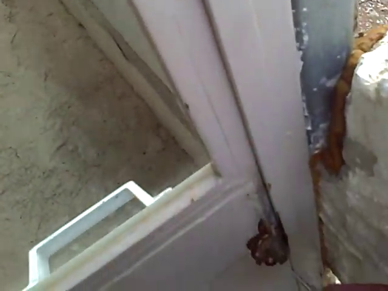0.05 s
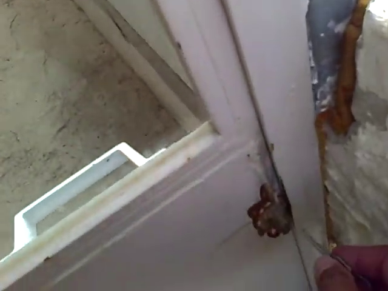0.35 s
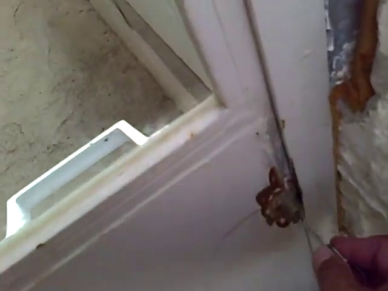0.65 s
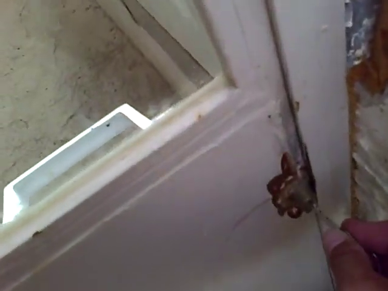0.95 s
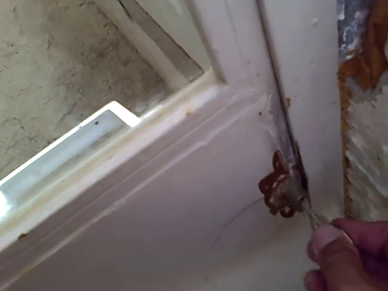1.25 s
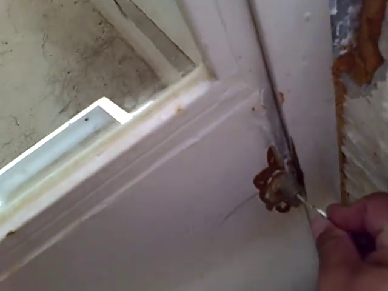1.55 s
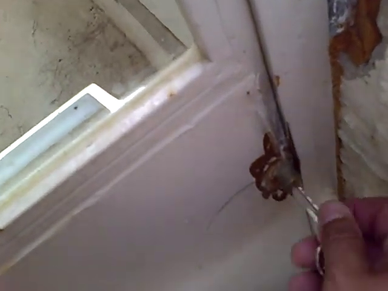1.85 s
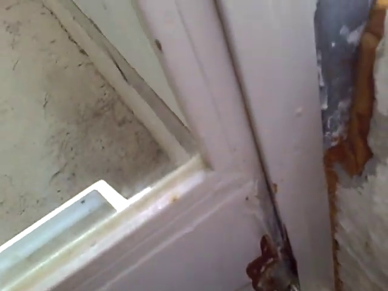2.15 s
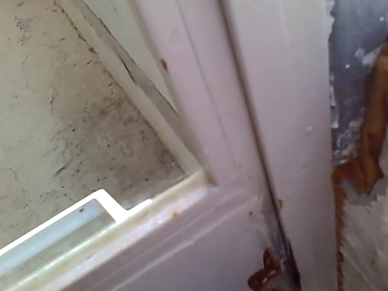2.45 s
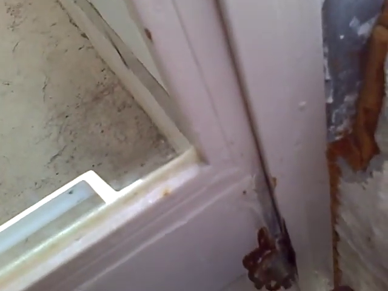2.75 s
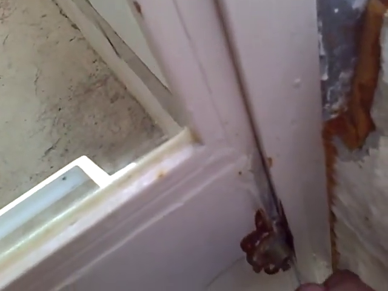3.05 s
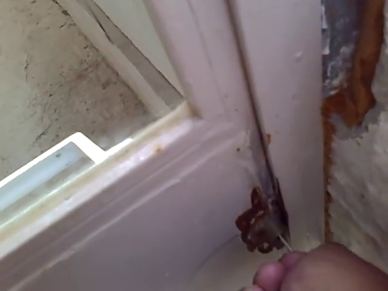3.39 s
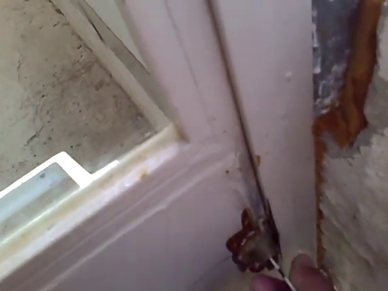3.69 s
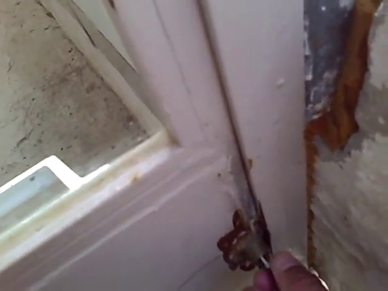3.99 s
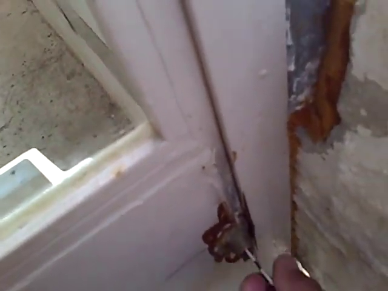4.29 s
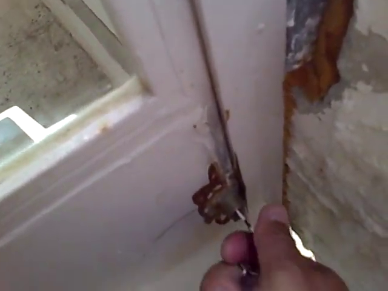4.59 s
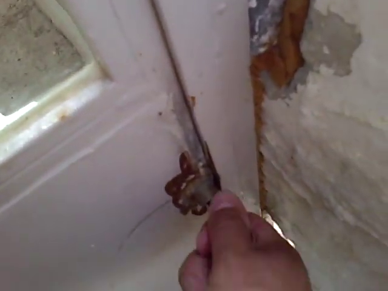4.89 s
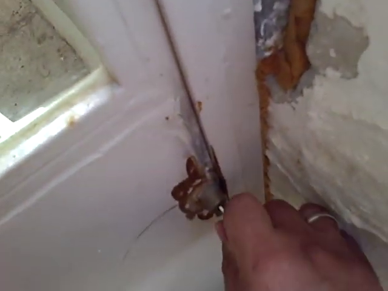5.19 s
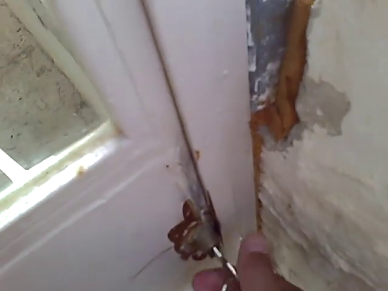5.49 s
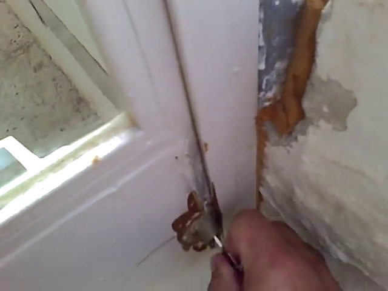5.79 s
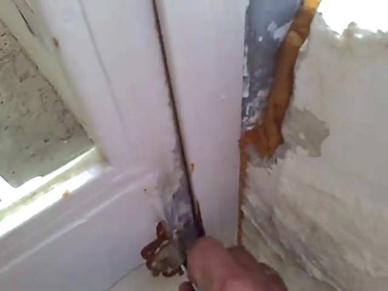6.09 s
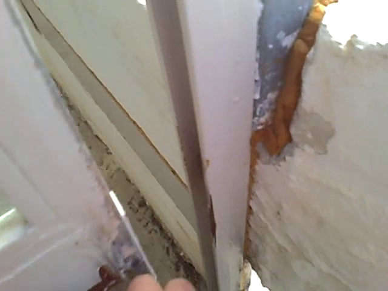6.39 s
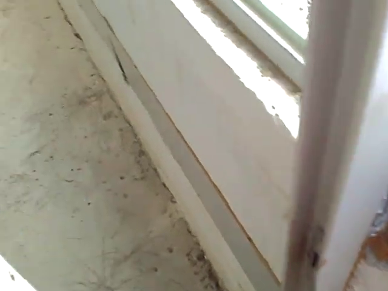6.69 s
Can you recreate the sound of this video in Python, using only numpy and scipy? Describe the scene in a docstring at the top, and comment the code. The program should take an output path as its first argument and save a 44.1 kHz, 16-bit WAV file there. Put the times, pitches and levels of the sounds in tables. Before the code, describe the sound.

Sharp metallic ticks and uneven knocks from a window latch over a low wooden shudder, with three loud clacks before the window swings open.

```python
"""Two dull taps close by, then a metal pin ticking and scraping in the rusty latch of an old wooden window. The
microphone is close to the hand, in a bare room. Each snap of the pin over rust rings the latch plate; the latch
knocks on the loose sash, which shudders in its frame as the hand leans on it. The latch gives with three loud
clacks, and the window swings open with a growing rumble of dragging wood."""
import sys
import numpy as np
from scipy import signal
from scipy.fft import rfft, irfft
from scipy.io import wavfile
from scipy.ndimage import uniform_filter1d

SR = 44100
rng = np.random.default_rng(int(sys.argv[2]) if len(sys.argv) > 2 else 0)


def inscribe(sig):
    """Save sig as 16-bit PCM at rate SR to the path in sys.argv[1].

    A 1-D sig is mono; a 2-D sig holds one channel per row.
    Samples are clipped to [-1, 1] before scaling.
    """
    pcm = np.round(np.clip(np.atleast_2d(sig).T, -1, 1) * 32767)
    wavfile.write(sys.argv[1], SR, pcm.astype(np.int16))


N = 306054
TIME = np.arange(N) / SR

# blows on the sash, mostly by the latch; the first, at 0.514 s, is a soft dull tap: (time [s], knock level
# [dB], thud level [dB], crack level [dB])
LATCH_BLOWS = [(0.514, -62, -72, -65.5), (0.804, -51.5, -56.5, -62), (1.136, -57, -57.5, -73),
               (1.159, -47.5, -60, -57), (1.181, -48, -54, -60), (1.284, -58, -48.5, -78),
               (1.373, -51, -63.5, -69), (1.4, -48.5, -46, -54.5), (1.717, -49, -51, -60.5),
               (1.771, -52, -41.5, -75), (2.054, -58, -46, -77), (2.088, -50, -60, -62.5),
               (2.156, -46, -46, -56.5), (2.23, -59, -45.5, -80), (2.353, -45, -50.5, -58.5),
               (2.678, -58.5, -50, -81), (2.775, -57.5, -50.5, -85), (2.825, -55.5, -45, -77),
               (2.88, -46, -50, -58), (2.953, -52.5, -51, -66.5), (3.08, -51, -45.5, -68.5),
               (3.115, -48.5, -44, -68.5), (3.266, -57.5, -48.5, -73.5), (3.444, -51, -50, -66),
               (3.468, -51, -43, -57.5), (3.491, -39.5, -34, -50), (3.512, -36.5, -32.5, -38.5),
               (3.766, -55.5, -37, -66), (4.048, -56.5, -45, -68.5), (4.148, -52.5, -61, -65),
               (4.237, -52, -43, -79.5), (4.331, -48.5, -42.5, -65), (4.409, -52, -49, -66),
               (4.543, -50, -39, -65.5), (4.602, -49.5, -44.5, -62), (4.926, -53, -47.5, -58.5),
               (5.003, -47.5, -47, -57), (5.02, -47.5, -49, -58), (5.154, -42.5, -49.5, -65),
               (5.164, -32, -43, -38.5), (5.178, -32, -38.5, -41), (5.195, -33, -47.5, -40),
               (5.208, -37, -54, -52.5), (5.551, -49.5, -39, -70), (5.607, -33, -39, -36.5),
               (6.08, -55, -48.5, -67), (6.26, -77, -48.5, -64), (6.695, -49, -37, -65)]
# a blow's knock, thud, crack and metallic edge: (low edge [Hz], high edge [Hz], trim [dB], rise [s])
BLOW_BANDS = [(500, 1550, -1.5, 0.0042), (106.2, 416, -2, 0.0028), (2030, 3880, 1.5, 0.0044),
              (4560, 6700, -6, 0.0037)]
# modes of the sash and its pane: (frequency [Hz], level [dB], t60 [s])
SASH_MODES = [(96.2, 2, 0.66), (152.6, -5.5, 0.42), (199.8, -1, 1), (217.7, 3, 1), (263.3, 4, 0.58),
              (289.5, -3, 0.99), (385.6, -5, 0.4), (426.5, 0, 0.7), (497, 6, 0.42), (651, 6.5, 0.23),
              (669, 3.5, .45), (734.6, 3, 0.35), (874, -1.5, 0.25), (988.6, 6, 0.17), (1046, 2.5, 0.063),
              (1076, -2.5, 0.32), (1184, -7, 0.42), (1260, -10, 0.15), (1400, 1, 0.18), (1443, 4, 0.21),
              (1430, -1, 0.17), (1623, -3, 0.13)]
# colour of the struck wood: (frequency [Hz], level [dB])
WOOD_SPECTRUM = [(70, 8.5), (300, -10), (700, -1.5), (1100, -7.5), (1500, 1.5), (1950, -17.5), (2500, -15),
                 (3400, -14), (4100, -15.5), (5000, -19), (6400, 4), (7500, -19)]
# dense wood vibration between the modes: (frequency [Hz], t60 [s])
WOOD_DECAY = [(100, 0.97), (300, 0.57), (700, 0.4), (1500, 0.19), (3000, 0.086), (6500, 0.068)]
# the steel pin on the latch: (time [s], pin level [dB], pitch [Hz], plate level [dB], snap level [dB])
PIN_TICKS = [(1.794, -49.5, 6310, -70.5, -59), (2.009, -41, 5400, -57.5, -35),
             (2.154, -31.5, 6140, -60, -39), (2.881, -43.5, 6050, -70, -46), (3.108, -48.5, 5900, -75, -44),
             (3.511, -24, 6160, -44, -10.5), (3.698, -48, 6230, -66, -42), (3.764, -36.5, 5700, -57.5, -54),
             (3.784, -40, 6200, -56, -38), (4.0763, -22, 6350, -58, -27.5), (4.124, -47, 6400, -68, -42),
             (4.148, -37, 6470, -60, -41), (4.193, -46, 6360, -71, -45), (4.1987, -42, 6450, -68, -51),
             (4.236, -35.5, 5900, -54, -43), (4.486, -51, 6500, -69, -54), (4.604, -45.5, 5900, -67, -47),
             (5.094, -38.5, 6650, -49.5, -47), (5.173, -21.5, 6000, -38, -26), (5.195, -23, 6580, -42, -44),
             (5.452, -33, 6450, -57.5, -48), (5.552, -44, 5570, -69, -67.5), (6.186, -57, 4740, -77, -55)]
# modes of the pin: (frequency [multiple of its pitch], level [dB], t60 [s])
PIN_MODES = [(.86, -3.5, 0.0024), (1, 7.5, 0.011), (1.1, 6, .006)]
# the hand leaning on the sash: (start [s], hold [s], level [dB])
HAND_PUSHES = [(0.783, .1, -56), (1.19, 0.34, -50.5), (1.7, 0.18, -41.5), (2.146, 0.16, -52),
               (2.834, .56, -49), (3.455, 0.08, -34), (3.66, 0.12, -40.5), (3.964, 0.74, -44),
               (4.892, 0.22, -45.5), (5.528, 0.22, -51), (6.076, .14, -45.5), (6.218, .72, -40.5)]
# deep sway of the sash: (frequency [Hz], level [dB])
SWAY_SPECTRUM = [(20, -11.5), (37, 10), (47, 0.5), (60, 0.5), (75, -1), (110, -58)]
# the sash shuddering in its frame: (frequency [Hz], level [dB])
SHUDDER_SPECTRUM = [(50, -13.5), (96, 1), (125, -4.5), (220, -8.5), (420, -15), (580, -18.5), (680, -15.5),
                    (900, -30), (1600, -31), (2500, -70)]
# dry wood dragging: (frequency [Hz], level [dB])
RUB_SPECTRUM = [(200, -26), (400, 7), (700, 4.5), (1400, 2.5), (1650, -6.5), (2000, -11.5), (3400, -16),
                (4400, -30), (6400, -23), (7600, -48)]
# modes of the sash once it hangs free: (frequency [Hz], level [dB], t60 [s])
GROAN_MODES = [(97.6, 7, 0.13), (146, -7.5, 0.28), (211, -3, 0.35), (252.7, -8.5, 0.28), (292, 4.5, 0.1),
               (384.5, -6, 0.22)]
# dull taps close to the microphone: (time [s], peak level [dB], upper edge [Hz], t60 [s])
DULL_TAPS = [(0.395, -40.5, 960, 0.15), (0.535, -42, 377, 0.082)]
# reverberation of the bare room: (frequency [Hz], t60 [s])
ROOM_DECAY = [(100, 1), (500, 0.91), (1500, 1), (3500, 0.84), (7000, 0.88)]
# background hiss at the microphone: (frequency [Hz], level [dB])
AIR_SPECTRUM = [(12, -25.5), (20, 9.5), (245, 1.5), (366, -6), (426, -1), (1020, -9), (1350, -5.5),
                (1650, -11), (1780, -11.5), (2280, -13), (3680, -15), (6230, -15.5), (6710, -15.5),
                (8000, -43.5), (10400, -46.5), (17600, -120)]


def latch_knocks(modes_db=-4, contact_spread_db=2.5, size=36000):
    """Close up, each blow on the sash, mostly by the latch, rings the sash modes and the dense wood between
    them."""
    out, t = np.zeros(N), np.arange(size) / SR
    modes = ring(SASH_MODES, size)
    contact_hz = np.geomspace(200, 7000, 18)
    attack = 1300  # opening samples that set a blow's level
    blows = []
    for noise in dying_noise(WOOD_DECAY, len(LATCH_BLOWS), size):
        # each point of contact favours other parts of the spectrum
        contact_db = contact_spread_db * rng.standard_normal(len(contact_hz))
        wood = colour(noise, np.transpose([contact_hz, read(WOOD_SPECTRUM, contact_hz) + contact_db]))
        blows.append(unit(wood, attack) + amp(modes_db) * unit(strike(modes), attack))
    blows = np.array(blows) * np.cos(np.pi / 2 * t / t[-1]) ** 2
    for k, (low_hz, high_hz, trim_db, rise_s) in enumerate(BLOW_BANDS):
        parts = band(blows * (1 - np.exp(-t / rise_s)), low_hz, high_hz)
        for (start, knock_db, thud_db, crack_db), part in zip(LATCH_BLOWS, parts):
            levels_db = knock_db, thud_db, crack_db, crack_db  # the metallic edge follows the crack
            add(out, start, amp(levels_db[k] + trim_db) * unit(part, attack))
    return out


def pin_ticks(pin_trim_db=-1, plate_trim_db=-3, snap_trim_db=-6, plate_hz=3330, contact_s=0.00078):
    """The pin snaps over rust in a brief rough contact; the plate rings and the window recess answers."""
    size = 6000
    out, t = np.zeros(N), np.arange(size) / SR
    for start, pin_db, pitch_hz, plate_db, snap_db in PIN_TICKS:
        rust, scatter, rattle = rng.standard_normal((3, size))
        force = rust * t / contact_s * np.exp(-t / contact_s)
        modes = ring(np.array(PIN_MODES) * [pitch_hz, 1, 1], size=800)
        pin = unit_peak(signal.fftconvolve(force, strike(modes))[:size])
        snap = unit_peak(band(force, 1700, 5700))
        recess = amp(-21) * unit(band(scatter, 6300, 6600, order=1)) * decay(t, t60=0.07)
        plate = band(rattle, plate_hz - 90, plate_hz + 90, order=1) * decay(t, t60=0.081)
        add(out, start, amp(pin_db + pin_trim_db) * (pin + recess))
        add(out, start, amp(snap_db + snap_trim_db) * snap)
        add(out, start, amp(plate_db + plate_trim_db) * unit(plate, size=1300))
        # the pin skips on over a crumb of rust
        add(out, start + rng.uniform(0.036, 0.042), amp(-59) * pin)
    return out


def sash_shudder(sway_db=-1.5, shudder_db=-3, modes_db=-2, jolt_db=-0.5, push_db=-3.5, thud_share=0.67):
    """Each push sways the loose sash; blows and pushes start small slips that keep its modes rumbling."""
    sway = np.sqrt(sum((amp(db) * swell(start, hold, t60=1.5)) ** 2 for start, hold, db in HAND_PUSHES))
    jolt_power = np.zeros(N)
    for start, knock_db, thud_db, _ in LATCH_BLOWS:
        blow_db = knock_db + thud_share * (thud_db - knock_db)
        jolt_power += (amp(jolt_db + blow_db) * swell(start, hold=0, t60=1.34)) ** 2
    shake = np.sqrt(jolt_power + (amp(push_db) * sway) ** 2)
    slips = grit(per_s=700, spread_db=-1)
    rough = steadied(colour(slips, SHUDDER_SPECTRUM))
    ringing = steadied(colour(rubbed(SASH_MODES, slips), SHUDDER_SPECTRUM))
    body = steadied(rough + amp(modes_db) * ringing)
    # the lowest mode only sounds fully when the whole sash sways
    lowest = signal.sosfiltfilt(signal.butter(3, 140, fs=SR, output="sos"), body)
    lowest_gain = np.minimum(amp(2) * sway / (shake + 1e-9), 1.25) ** 0.55
    body = body + lowest * (lowest_gain - 1)
    deep = steadied(colour(rng.standard_normal(N), SWAY_SPECTRUM))
    return deep * sway * amp(sway_db) + body * shake * amp(shudder_db)


def window_swing(start_s=6.04, speedup_s=0.866, brake_s=0.14, rub_db=-36, groan_db=-29, catch_db=1.5):
    """Dry wood drags as the sash opens: a dull rush that catches and lets go, over the sash's groan."""
    t = TIME - start_s
    # the sash speeds up evenly, then the hand checks it
    speed = np.maximum(np.minimum(t / speedup_s, 1 - (t - speedup_s) / brake_s), 0)
    catches = amp(catch_db * unit(band(rng.standard_normal(N), 6, 30, order=2)))
    friction = catches * rng.standard_normal(N)
    rub = steadied(colour(friction, RUB_SPECTRUM))
    groan = steadied(band(rubbed(GROAN_MODES, friction), 30, 1500, order=2))
    return rub * amp(rub_db) * speed ** 1.92 + groan * amp(groan_db) * speed ** 0.98


def dull_taps(low_hz=110, size=8000):
    """Soft dull taps near the microphone, with no ring."""
    out, t = np.zeros(N), np.arange(size) / SR
    for start, peak_db, top_hz, t60 in DULL_TAPS:
        tap = band(rng.standard_normal(size) * decay(t, t60), low_hz, top_hz)
        add(out, start, amp(peak_db) * unit_peak(tap))
    return out


def hand_slide(start_s=5.9, end_s=6.14, level_db=-70):
    """A dry hand shifts its grip over the paint: a faint high hiss that swells and fades."""
    stroke = np.sin(np.pi * np.clip((TIME - start_s) / (end_s - start_s), 0, 1))
    return amp(level_db) * stroke * unit(band(rng.standard_normal(N), 5900, 6600, order=1))


def bare_room(direct, wet_db=-17.5, build_s=0.0037):
    """The room rings on behind each blow, well below the direct sound at this distance."""
    tail = dying_noise(ROOM_DECAY, count=1, size=40000)[0]
    tail *= 1 - np.exp(-(np.arange(len(tail)) / SR / build_s) ** 2)
    return direct + amp(wet_db) * signal.fftconvolve(direct, tail / np.linalg.norm(tail))[:N]


def room_tone(level_db=-63):
    """Faint steady hiss behind everything."""
    return amp(level_db) * unit(colour(rng.standard_normal(N), AIR_SPECTRUM))


def ring(modes, size):
    """One row for each freely dying mode, as a complex wave."""
    hz, db, t60 = np.transpose(modes)[:, :, None]
    t = np.arange(size) / SR
    return amp(db) * np.exp(2j * np.pi * hz * t) * decay(t, t60)


def strike(waves):
    """A blow starts each mode at a random phase."""
    phases = np.exp(2j * np.pi * rng.random(len(waves)))
    return (phases @ waves).real


def rubbed(modes, slips):
    """Modes kept ringing by a stream of slips."""
    return signal.fftconvolve(slips, strike(ring(modes, size=30000)))[:N]


def grit(per_s, spread_db):
    """A stream of tiny slips of uneven size."""
    sizes = amp(spread_db * np.minimum(rng.exponential(1, N), 4))
    signs = rng.choice([-1, 1], N)
    return unit(sizes * signs * (rng.random(N) < per_s / SR))


def dying_noise(t60s, count, size):
    """Rows of noise in which each frequency dies at its own speed."""
    hz, t, spectra = signal.stft(rng.standard_normal((count, size)), SR, nperseg=256)
    spectra *= decay(t, read(t60s, hz)[:, None])
    return signal.istft(spectra, SR)[1][:, :size]


def swell(start, hold, t60, rise_s=0.022):
    """Gain that rises from start, holds, then dies away."""
    t = np.maximum(TIME - start, 0)
    return (1 - np.exp(-t / rise_s)) * decay(np.maximum(t - hold, 0), t60)


def decay(t, t60):
    """Gain that falls 60 dB every t60 seconds."""
    return np.exp(-np.log(1000) * t / t60)


def amp(db):
    """Decibels to gain."""
    return 10 ** (np.asarray(db) / 20)


def unit(x, size=None):
    """Scales to rms 1 over the first size samples."""
    return x / np.sqrt(np.mean(x[:size] ** 2) + 1e-20)


def unit_peak(x):
    """Scales to peak 1."""
    return x / abs(x).max()


def steadied(x, size=5000):
    """Holds the short-time rms at 1."""
    return x / np.sqrt(abs(uniform_filter1d(x ** 2, size)) + 1e-12)


def read(points, hz):
    """Reads a table on a log-frequency axis."""
    table_hz, value = np.transpose(points)
    return np.interp(np.log(hz + 1), np.log(table_hz + 1), value)


def colour(x, points):
    """Filters by a table of (frequency [Hz], level [dB])."""
    hz = np.fft.rfftfreq(len(x), 1 / SR)
    return irfft(rfft(x) * amp(read(points, hz)), len(x))


def band(x, low_hz, high_hz, order=3):
    """Causal band-pass."""
    return signal.sosfilt(signal.butter(order, [low_hz, high_hz], "band", fs=SR, output="sos"), x)


def add(mix, start, sound):
    """Mixes a sound in at start seconds."""
    part = mix[round(start * SR):][:len(sound)]
    part += sound[:len(part)]


def scene():
    """Latch, sash, hand and room tone from one spot beside the window, in mono."""
    latch = bare_room(latch_knocks()) + pin_ticks()
    return (latch + dull_taps() + sash_shudder() + window_swing() + hand_slide() + room_tone())[None]


def record(dry):
    """A narrow-band microphone: the treble falls off steeply at 7500 Hz."""
    low_pass = signal.firwin(161, 7500, window=("kaiser", 7), fs=SR)
    return signal.oaconvolve(dry, low_pass[None], "same")


dry = scene()
out = record(dry)
inscribe(out)
```